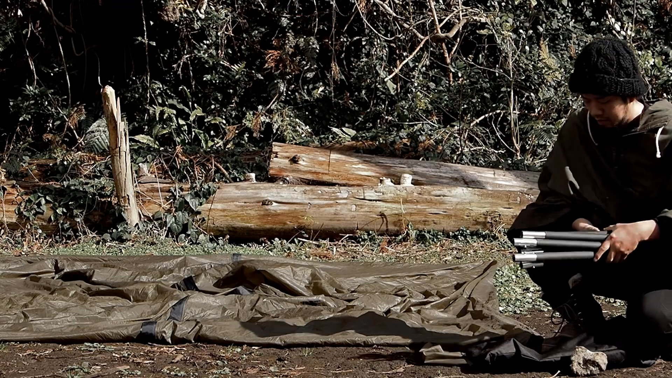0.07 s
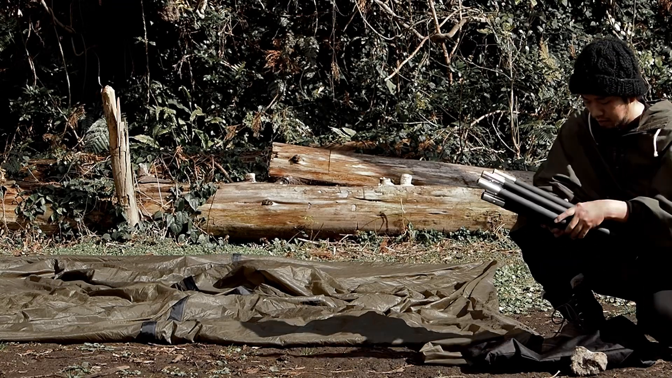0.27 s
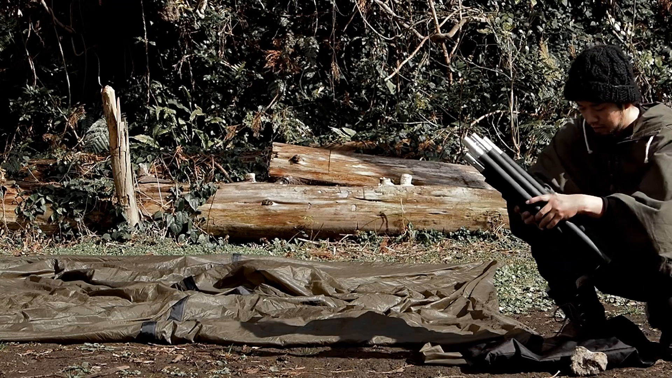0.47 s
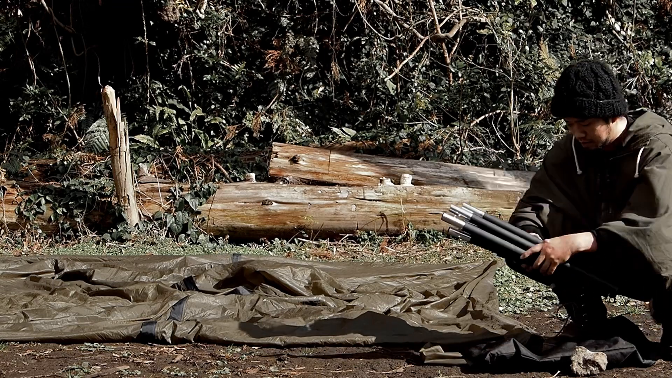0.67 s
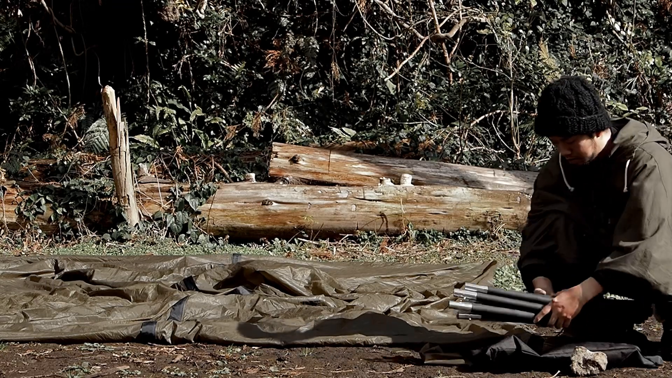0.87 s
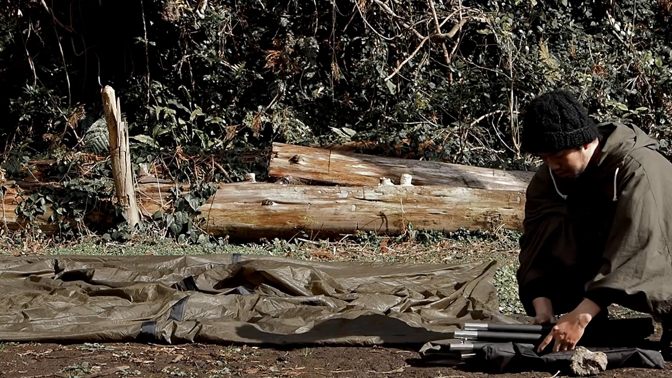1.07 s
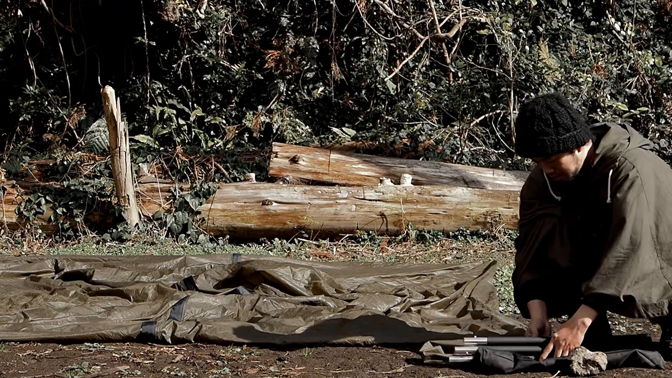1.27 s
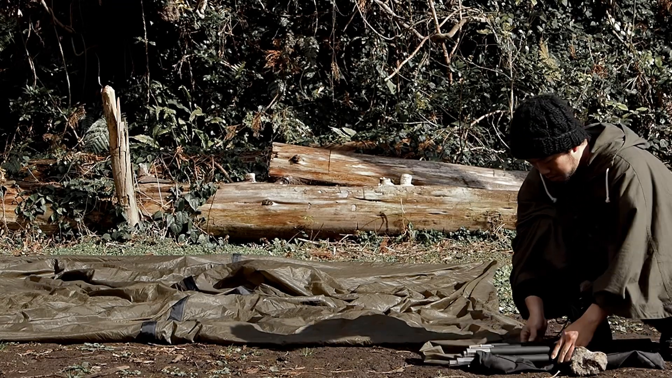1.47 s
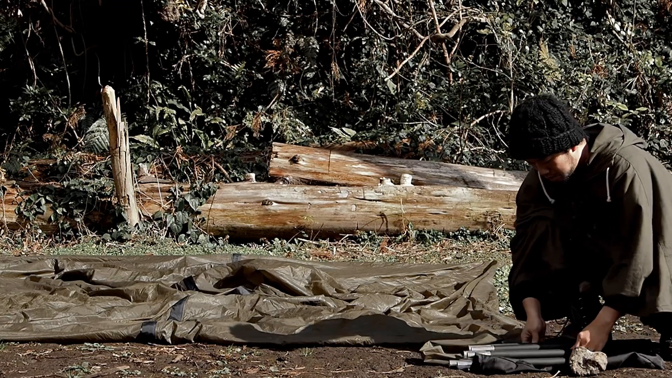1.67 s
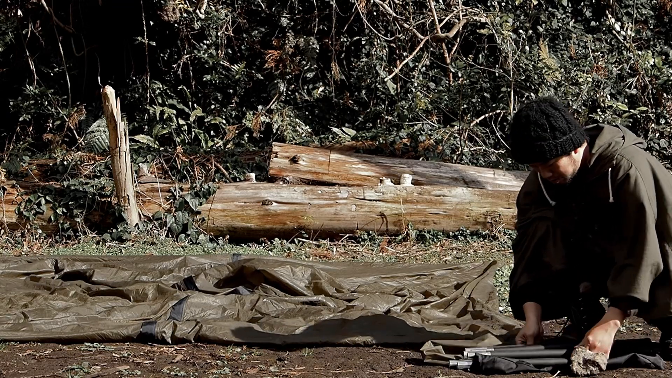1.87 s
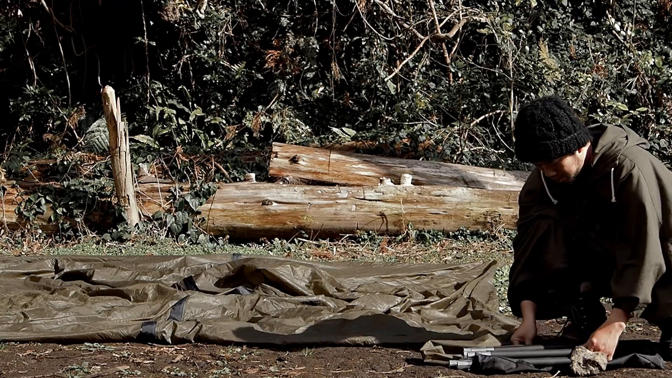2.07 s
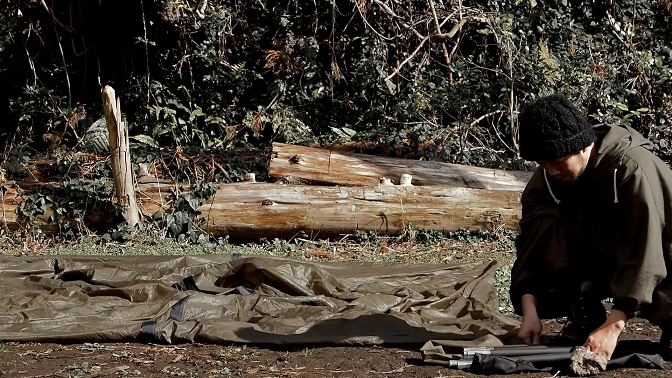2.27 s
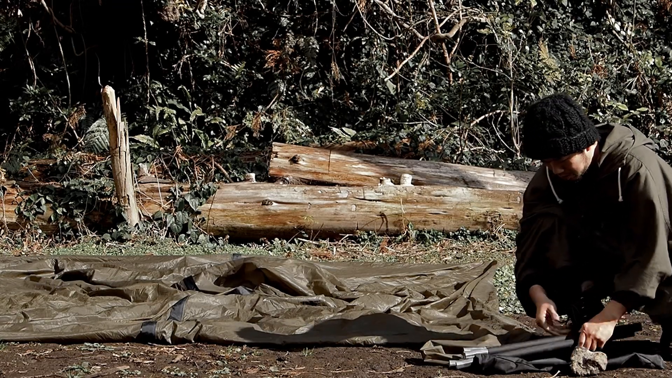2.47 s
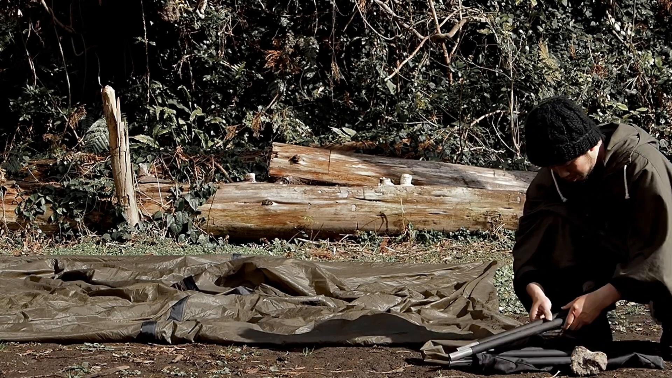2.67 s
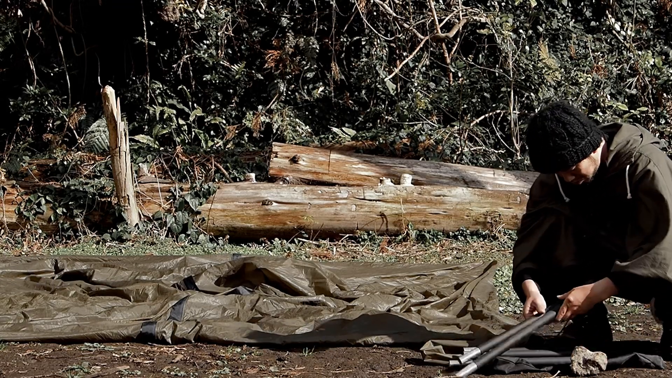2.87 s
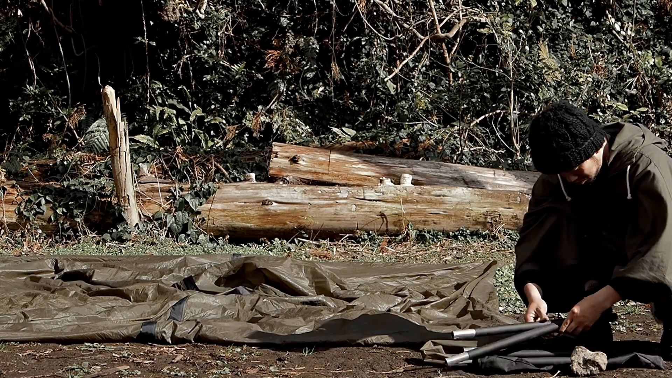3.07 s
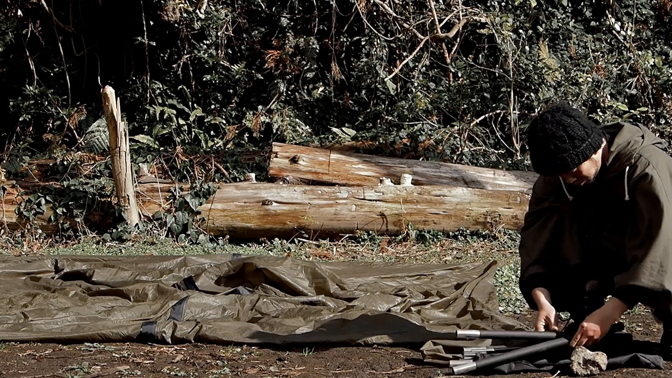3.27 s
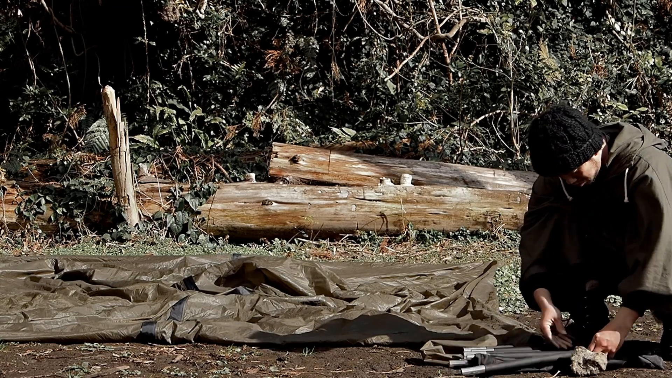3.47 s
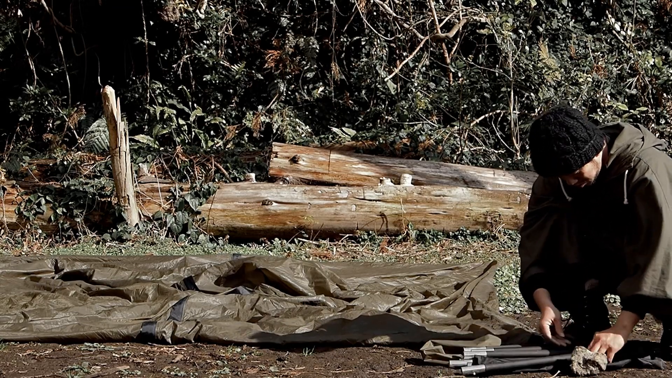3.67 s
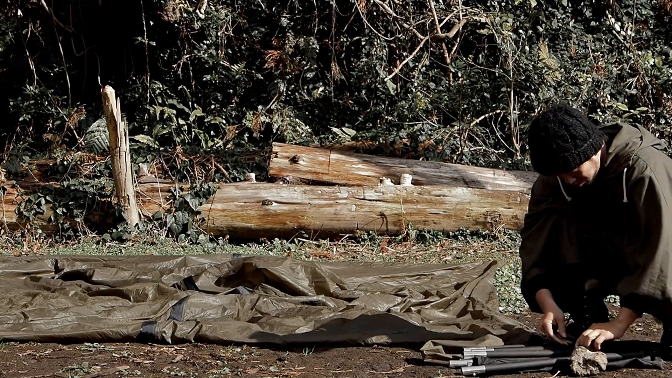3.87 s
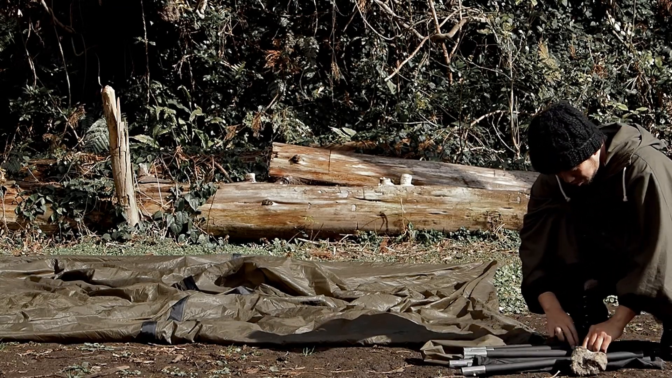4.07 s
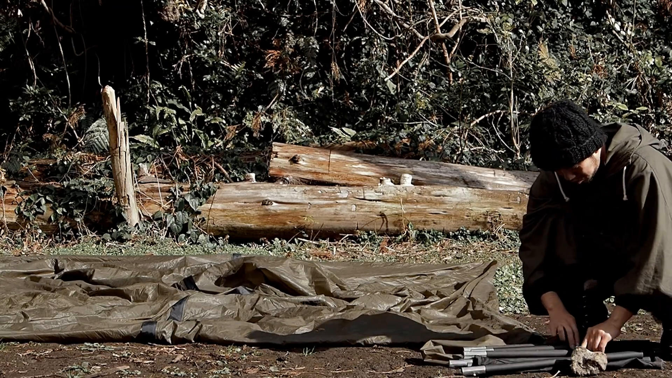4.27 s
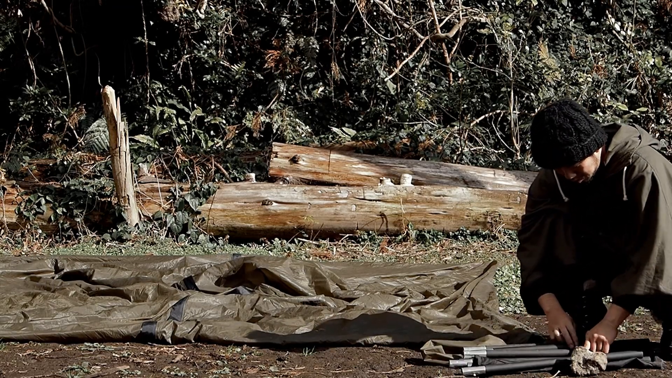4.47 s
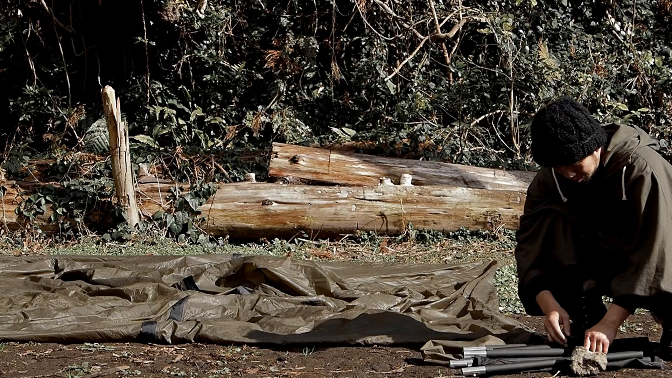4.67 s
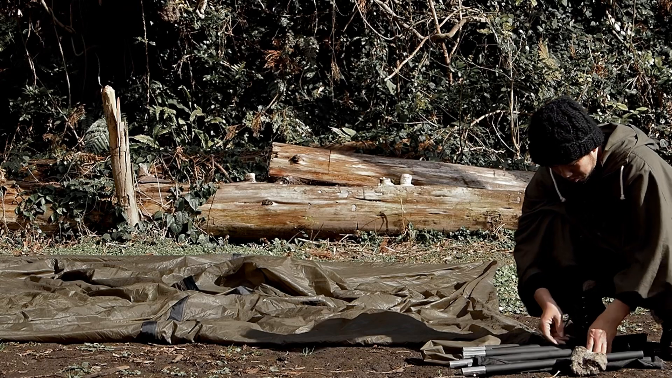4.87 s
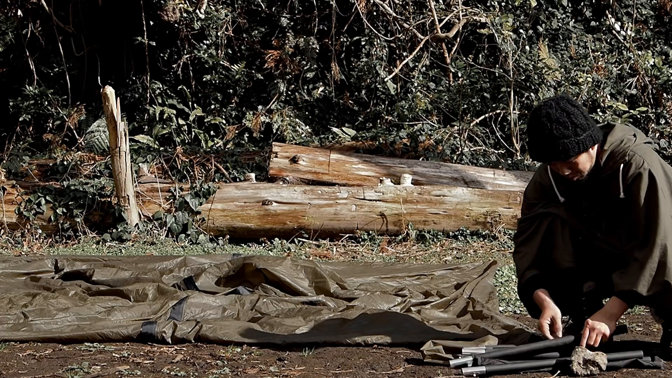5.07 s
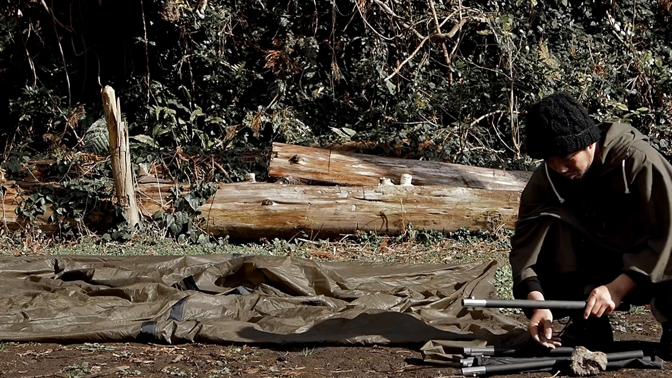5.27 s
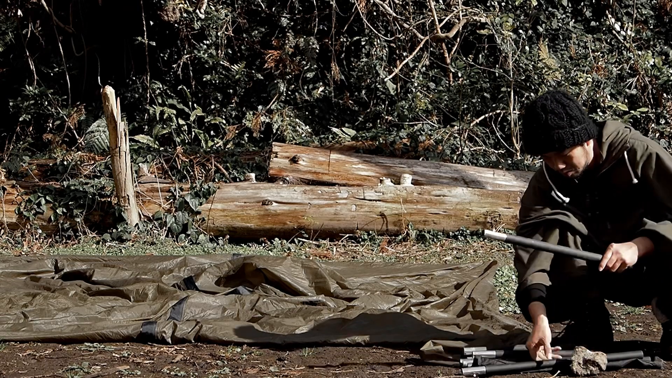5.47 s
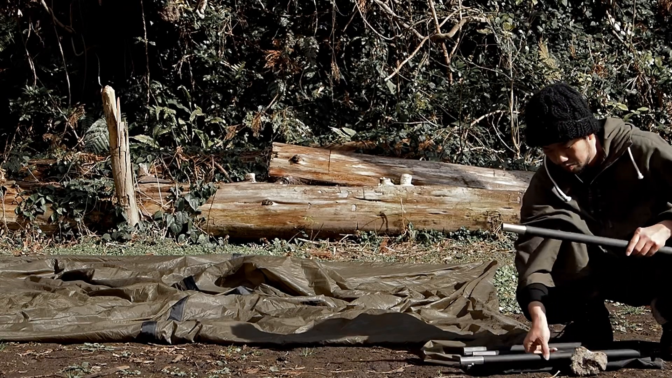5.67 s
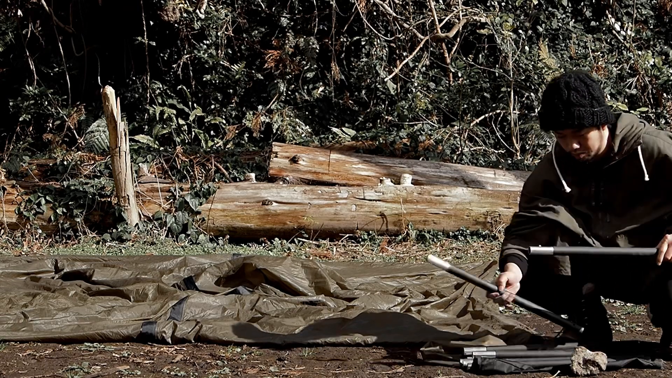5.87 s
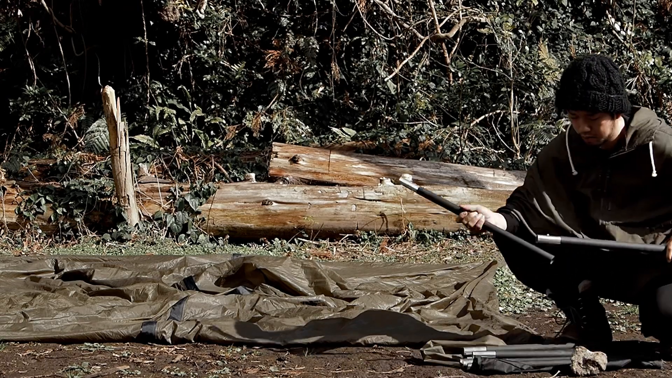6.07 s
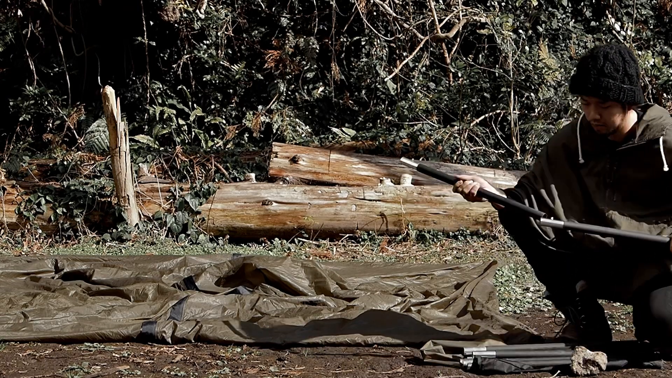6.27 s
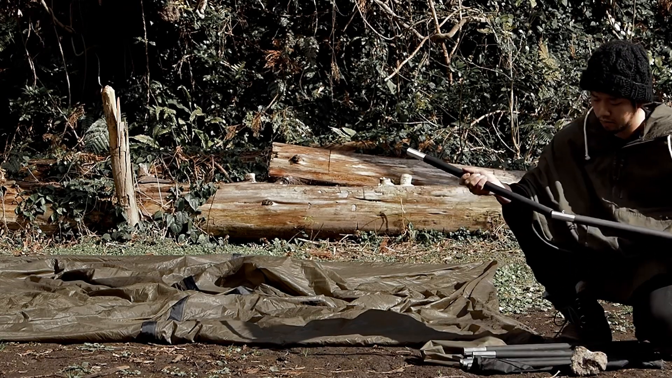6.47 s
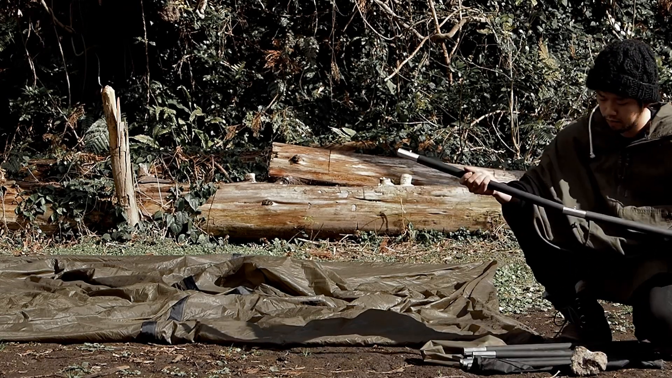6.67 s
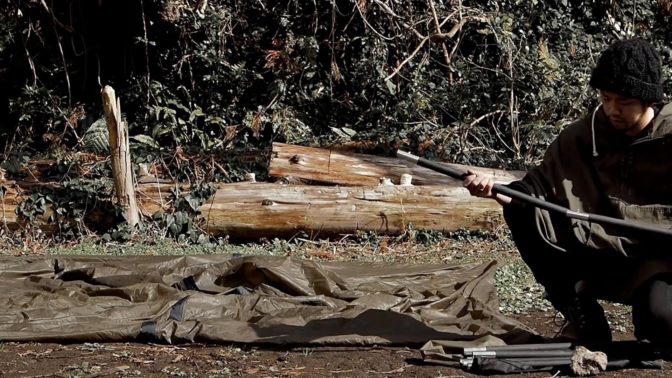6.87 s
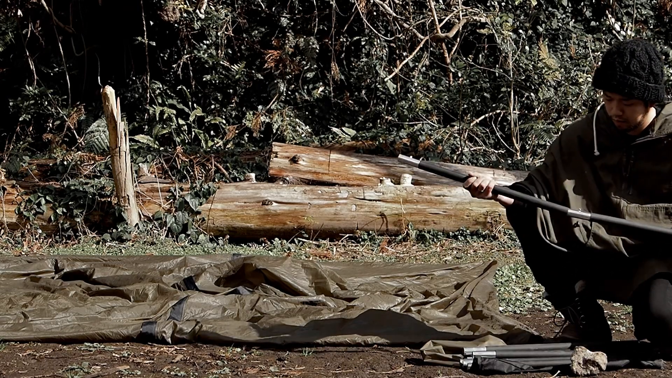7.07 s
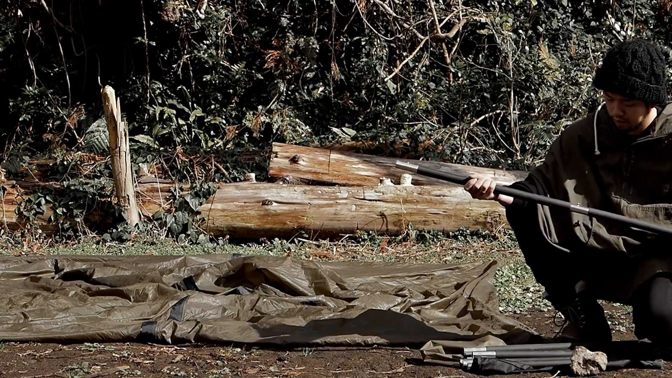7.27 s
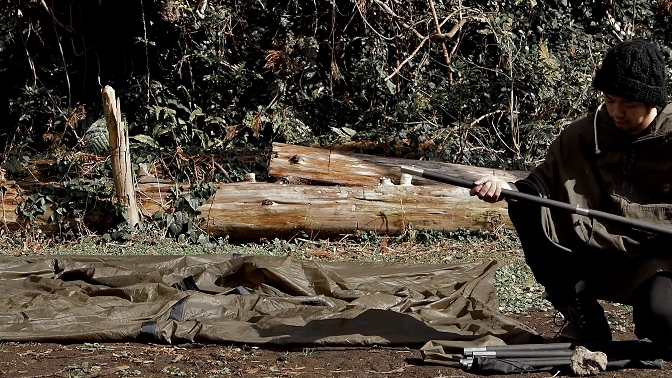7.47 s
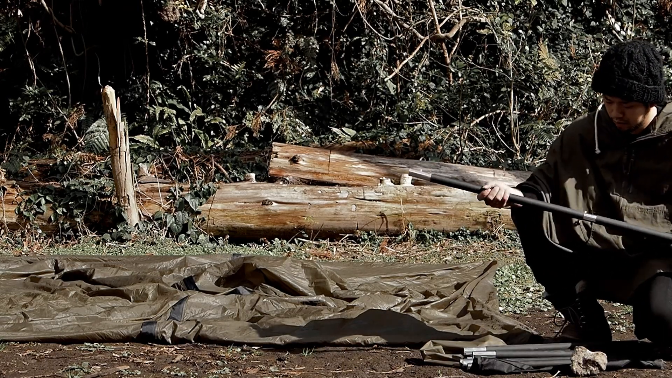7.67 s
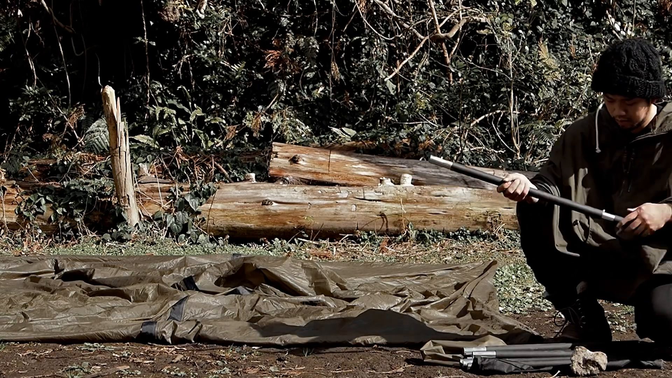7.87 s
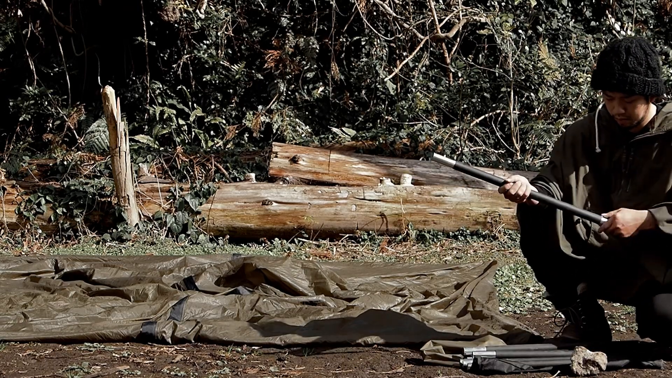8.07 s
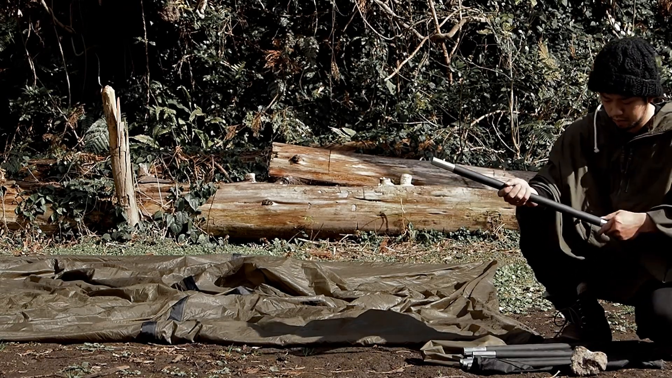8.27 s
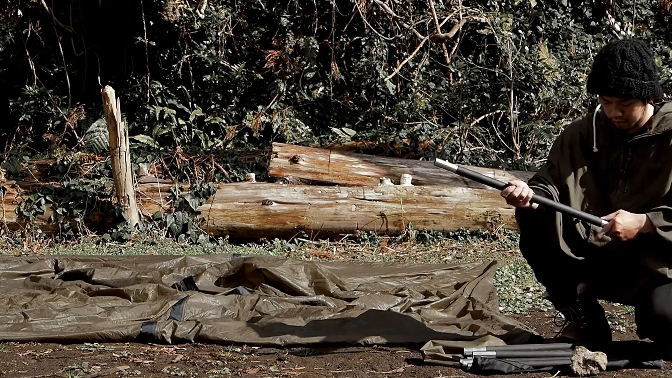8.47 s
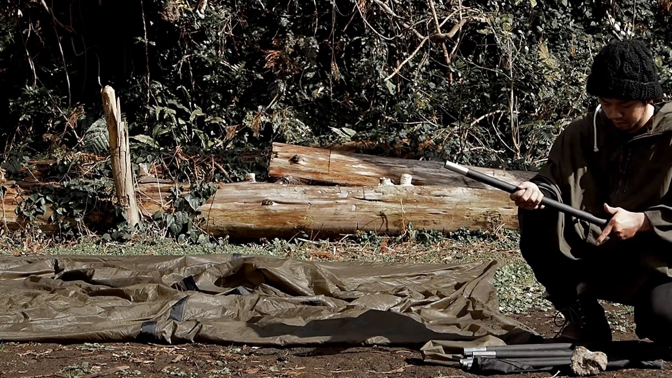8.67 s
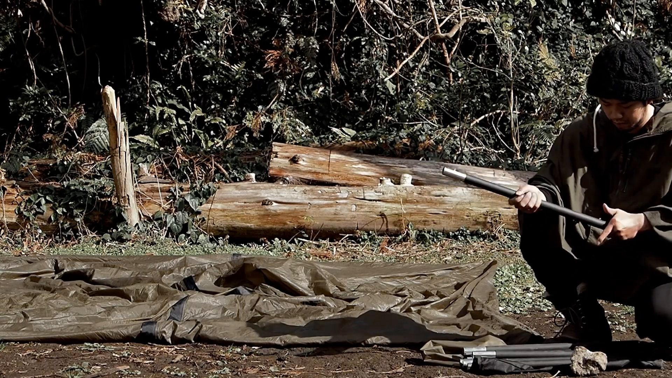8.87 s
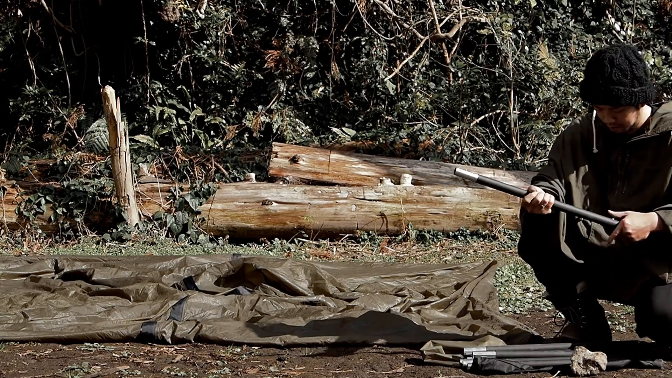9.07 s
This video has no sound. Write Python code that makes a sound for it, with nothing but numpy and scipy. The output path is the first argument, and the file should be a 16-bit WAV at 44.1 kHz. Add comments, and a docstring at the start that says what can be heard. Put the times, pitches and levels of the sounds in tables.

```python
"""A scuff of hollow metal tent poles over a puff of wind at the left port opens the scene; a bundle then
clinks, rattles and skids onto a tarpaulin at the right, is sorted, and two poles are slid together.
Rough contacts build up tuned modes for the metal; filtered noise makes the rustle, wind, air and sliding.
Small birds, near-sine calls smeared into bands, whistle far off in the thicket, which scatters a short tail.
Wind strikes the two microphone ports separately, the right one hardest."""
import sys
import numpy as np
from scipy import signal
from scipy.fft import rfft, irfft, next_fast_len
from scipy.io import wavfile
from scipy.ndimage import uniform_filter1d

SR = 44100
rng = np.random.default_rng(int(sys.argv[2]) if len(sys.argv) > 2 else 0)


def transcribe(signal):
    """Save signal, clipped to [-1, 1], as a 16-bit WAV file at the path in sys.argv[1]."""
    frames = np.atleast_2d(signal).T
    limited = np.clip(frames, -1, 1)
    pcm = np.round(limited * 32767).astype(np.int16)
    wavfile.write(sys.argv[1], SR, pcm)


N = 402191  # length in samples

# Quiet wash of the thicket: hz, gain_db
AIR_SPECTRUM = [(120, -55), (200, -3.5), (289, -1.5), (491, -11), (1160, -5), (1770, -16.5), (2910, -5.5),
                (3970, -11), (5630, -14.5), (10100, -18), (11300, -27), (13800, -16.5), (16000, -37.5)]
AIR_DB = -67
# Likeness of the air in the two ports: hz, likeness (0 unrelated, 1 identical)
AIR_LIKENESS = [(250, 1), (700, 0.56), (2000, 0.09), (6000, 0.063), (15000, 0.054)]

# Gusts, each striking one port: middle_s, peak_db (before turbulence), spread_s, port (0 left, 1 right)
GUSTS = [(0.051, -50, 0.044, 0), (.22, -69, 0.029, 0), (.35, -57, 0.028, 0), (.55, -67, 0.071, 0),
         (.6, -59, 0.096, 1), (1.95, -56, 0.21, 0), (2.05, -62.5, 0.13, 1), (2.2, -51.5, 0.045, 1),
         (2.3, -49, 0.14, 0), (2.702, -47.5, 0.057, 0), (2.798, -41, 0.052, 0), (2.931, -40.5, 0.041, 1),
         (3.05, -44, 0.025, 0), (3.072, -40, 0.052, 1), (3.239, -41.5, 0.028, 0), (3.36, -46.5, 0.15, 0),
         (3.549, -40.5, 0.022, 0), (3.55, -56.5, 0.1, 1), (3.822, -51.5, 0.06, 0), (3.969, -47.5, 0.017, 1),
         (4.075, -45, 0.021, 1), (4.186, -39.5, 0.1, 1), (4.269, -55, 0.014, 1), (4.336, -63, 0.031, 1),
         (4.498, -55, 0.35, 1), (5.002, -50, 0.19, 0), (5.269, -42.5, 0.0098, 0), (5.44, -45.5, 0.038, 1),
         (5.52, -54, 0.085, 1), (5.599, -29, 0.047, 1), (5.688, -42.5, 0.04, 1), (5.764, -46, 0.018, 1),
         (5.972, -46, 0.069, 1), (6.168, -44, 0.062, 1), (6.36, -63.5, 0.36, 1), (7.287, -50, 0.07, 0),
         (7.575, -49.5, 0.044, 0), (8.072, -57.5, 0.18, 1), (8.29, -47.5, 0.13, 1), (8.7, -58, 0.18, 1),
         (9.1, -53.5, 0.18, 1)]
GUST_FALL_DB, GUST_SHAPE = 10, 1  # fall at one spread from the middle; exponent of the fall
BREEZE_DB = -81

# Hands moving the bundle: time_s, rattle_db (before the trim in rattle and the rest below)
HANDLING = [(0.0, -53), (0.25, -66.5), (0.9, -67.5), (1.1, -53), (1.24, -36.5), (1.45, -32.5), (1.6, -43),
            (1.7, -52.5), (2.0, -57), (2.35, -62), (2.5, -59.5), (2.8, -51.5), (3.0, -70.5), (3.5, -65),
            (3.62, -53.5), (3.95, -62), (4.55, -60.5), (4.75, -52), (5.07, -45), (5.2, -48.5), (5.5, -54.5),
            (5.8, -69.5), (7.0, -69.5), (8.1, -88.5), (8.7, -52.5), (8.85, -65.5), (9.12, -57.5)]
BUNDLE_RESTS_S = 5.9  # the rattle sinks 40 dB over the next second
# Cloth and tarpaulin: hz, gain_db
RUSTLE_SPECTRUM = [(120, -72), (300, -27), (700, -9.5), (1500, -14), (3000, -7), (4500, -18), (5500, -5),
                   (8000, -13), (11000, -17), (15000, -17)]
# The rustle follows the rattle, less steeply: its level when the rattle is at BUSY_DB, and dB per dB
RUSTLE_DB, RUSTLE_SLOPE, BUSY_DB = -57.5, 0.82, -42.5

# Modes of the bundle: hz, level_db, t60_s
BUNDLE_MODES = [(995, -17.5, 0.0768), (1360, -7, 0.1), (1393, -11.5, 0.093), (1542, -2.5, 0.025),
                (1760, -16, 0.13), (1828, -9.5, 0.028), (2300, -21.5, 0.0508), (2350, -10, 0.16),
                (2465, 9, 0.089), (2530, -13, 0.55), (2502, 10, 0.099), (2674, 12.5, 0.018),
                (2960, 3, 0.011), (3240, -11, 0.0218), (3765, -9, 0.037), (3880, -0.5, 0.04),
                (5120, -8, 0.15), (5300, -12, 0.14), (5220, -12, 0.12), (5550, -8, .13),
                (5840, -10.5, 0.067), (6200, -13.5, 0.1), (7220, -5, 0.04)]
# Modes of the two poles in the hands: hz, level_db, t60_s
HELD_MODES = [(1340, 6.5, 0.13), (1377, 2.5, 0.099), (2160, 16, 0.026), (1640, 24.5, 0.0087),
              (2320, 23, 0.021), (5010, -7, 0.23), (5550, -26, 0.085), (6350, -8, 0.074), (6800, -8, .03)]
# Modes of the joint, gripped on both sides: hz, level_db, t60_s
JOINT_MODES = [(600, -0.5, 0.041), (1300, 0, 0.035), (1700, 5.5, 0.025), (2950, 18, 0.028),
               (5100, 0, 0.064), (5500, -6, .05), (6900, -2, .02), (14200, -8, .04)]
FAVOUR_DB, FAVOUR_WIDTH_HZ = 9.5, 194  # the place struck favours the modes near one pitch

# Tubes dragged briefly over each other. The three balances are relative to the blow, before trims in excite:
# middle_s, blow_db, low_bending_db, wall_db, ringing_db, contact_s
SCUFFS = [(0.014, -34.5, -13, -20, -9.5, 0.024), (0.171, -42.5, -13, -14.5, -32, 0.016),
          (0.489, -52, -16, -6, -6.5, 0.04), (0.956, -39.5, -3, -5, -34, 0.038),
          (1.14, -44.5, 5.5, -18, -25, .03), (1.202, -27.5, -3.5, -14, -29, 0.013),
          (1.249, -30.5, -1, -38, -5.5, 0.011), (1.31, -28, -18, -36, 0, 0.011),
          (1.391, -30, -15.5, -25, -14, .005), (1.331, -31, -17, -20, -4, 0.0053),
          (1.623, -28.5, -15.5, -19, -8.5, 0.01), (1.91, -35, -5, -21, -20, 0.029),
          (2.532, -52, -5, -18, -4.5, 0.022), (2.298, -49, -8, -0.5, -8, 0.021),
          (2.61, -54, -5, -19, -2, 0.021), (2.699, -55.5, -26, -3.5, 5.5, 0.019),
          (2.847, -47.5, -15, -4, 0.5, 0.034), (3.074, -46.5, -10, -11.5, -2, 0.041),
          (3.237, -43.5, -9, -4, -4.5, 0.015), (3.248, -33, -24, -15, -3.5, 0.0059),
          (3.323, -46.5, -19, -15, 2, 0.0085), (3.806, -38, -18, -11.5, 5, 0.011),
          (4.223, -45, -8, -2, -16, 0.02), (4.53, -52.5, -27, -8.5, 5, 0.013),
          (4.802, -35, -7, -20, -8, 0.0084), (4.865, -51, -43, -35, 11.5, 0.0098),
          (5.078, -35.5, -8.5, -9.5, 0, 0.012), (5.119, -40.5, -5, 1, -9, 0.014),
          (5.439, -36.5, -7, -8.5, -11, 0.033), (5.582, -49, -10.5, -22, 1.5, 0.0074),
          (5.723, -44.5, -12.5, -11, -1, 0.012)]
# Short rubs at the joint: middle_s, blow_db, low_bending_db, wall_db, ringing_db, contact_s
JOINT_RUBS = [(7.248, -51, -21.5, 0.5, -5, 0.009), (7.287, -53, -24, -0.5, -22, 0.0074),
              (7.45, -48, -30, -3, -7, .006), (7.475, -52, -26, -3, -12, 0.015)]
SCUFF_CRACK_DB, SCUFF_CRACK_SLOPE = -26.5, 0.72  # base crack, and dB per dB of wall balance

# Clinks in the bundle, balances as for the scuffs:
# start_s, blow_db, low_bending_db, wall_db, ringing_db, contact_s, favoured_hz
CLINKS = [(0.109, -39, -3.5, -22, -30, 0.0038, 5300), (0.9652, -14.5, -13, -12.5, -19.5, 0.0042, 995),
          (1.1937, -21.5, 9.5, -9, -19, 0.0019, 5800), (1.279, -14.5, -9, -13, -15, 0.015, 5670),
          (1.381, -17, -13.5, -15.5, -18, 0.01, 5300), (1.4078, -24, -6, -17, -7.5, 0.0043, 2370),
          (1.427, -21, -18, -25, -1.5, 0.0035, 3850), (1.4889, -15.5, -5, -13.5, -6, 0.0039, 5460),
          (1.4987, -22.5, -4.5, -6, -4, 0.003, 2350), (1.507, -24.5, -2, -23, 0, 0.0042, 5100),
          (1.618, -24, -9, -26, -19, 0.0019, 5210), (1.728, -39.5, -9, -37, -11.5, 0.0026, 2420),
          (1.767, -42, 1, -35, -21, 0.0022, 1430), (1.797, -42, -19, -23, -13, .004, 2960),
          (2.131, -34.5, -10, -20, -10, 0.0042, 5300), (2.2724, -35, -15, -16, -1.5, 0.0067, 5200),
          (2.562, -39, -4.5, -9, -14, 0.027, 5300), (2.6012, -34, -10, -10, -37, 0.0056, 5300),
          (3.013, -49, -6, -13, -4.5, 0.0053, 5300), (3.5356, -12.5, -17.5, -14, -15.5, 0.0035, 2465),
          (3.5894, -28.5, -9, -15, -33, 0.011, 5300), (3.719, -39, -1, -33, -33, 0.0015, 5300),
          (3.7661, -27, -12, -11, 1.5, 0.0067, 5580), (4.079, -37.5, 0.5, -38, -33, 0.0028, 5300),
          (4.099, -51.5, 3, -7, -2, 0.0022, 5300), (4.432, -38, -13.5, -24, -2, 0.0051, 5300),
          (4.5157, -42.5, -14, -12, -1, 0.0027, 5300), (4.6042, -38.5, -9, -41, -2, 0.038, 5300),
          (4.702, -36, -6.5, -25, -11, 0.0023, 5300), (4.7759, -36, -20, -20, -1, 0.0046, 5300),
          (4.8154, -18, -17, -18.5, -10.5, 0.0035, 2960), (4.8202, -30, -20, -18, -22, 0.0013, 2960),
          (4.9066, -28, -21, -32, -1, 0.007, 5300), (4.966, -31, -29, -13, 9, 0.079, 5500),
          (5.002, -32.5, -1, -11.5, -6.5, 0.0086, 5300), (5.043, -29, -8, -12, -6, 0.0078, 5530),
          (5.1475, -31, -1.5, -25, -12, 0.005, 5100), (5.1971, -27, -18, -19, 2.5, 0.0035, 5300),
          (5.214, -36, -18, -19, -7, 0.0018, 5300), (5.2263, -12.5, -27, -10, -7.5, 0.0012, 2960),
          (5.2314, -20, -47, -12, 1.5, 0.0058, 5300), (5.246, -49.5, 0, -31, 3.5, 0.026, 1345),
          (5.3887, -16, -20, -19, -5.5, 0.0031, 5620)]
# Knocks of the two held poles: start_s, blow_db, low_bending_db, wall_db, ringing_db, contact_s, favoured_hz
KNOCKS = [(6.303, -36, -12, -14, -7, 0.002, 6350), (6.3332, -45, -10, -14, -6.5, 0.0047, 5550),
          (6.442, -35.5, -8.5, -13, -6.5, 0.005, 5010), (6.4965, -34.5, -12.5, -16.5, -8.5, 0.0045, 5010)]
# Snaps of the joint: start_s, blow_db, low_bending_db, wall_db, ringing_db, contact_s, favoured_hz
SNAPS = [(7.2935, -40.5, -11, -8, -17, .003, 1300), (7.489, -32.5, -22.5, -5, -22, .004, 2950),
         (7.495, -54.5, -3, -30, -3, 0.002, 600), (7.502, -40, -14, -16, -20, .003, 1700),
         (8.246, -53, -16, -4, -22, .0025, 5500), (8.6207, -20.5, -21.5, -5, -20, 0.0052, 6900),
         (8.727, -57, -7, 1, -20, .0022, 5500), (8.756, -26.5, -18.5, 0, -30, 0.003, 5500)]
# How bundle tubes are struck: trailing_rub_share, tick_share, crack_db, crack_db_per_wall_db, body_2500_hz_db
BUNDLE_STRIKE = (0.2957, 0.7, -6.5, 2, 10.5)
# How held poles are struck: trailing_rub_share, tick_share, crack_db, crack_db_per_wall_db, body_2500_hz_db
HELD_STRIKE = (0.9, -0.1, -13.5, 1.77, -5)
# How the joint is struck: trailing_rub_share, tick_share, crack_db, crack_db_per_wall_db, body_2500_hz_db
JOINT_STRIKE = (0.18, 1.9, -12.5, 2.73, 3)

# Distant birds, one call a row: start_s, length_s, level_db (at the start), pitch_hz (after the scoop), blur_hz
BIRDS = [(0.624, 0.054, -63.5, 6500, 250), (0.723, 0.37, -56, 3710, 354), (6.1, 0.34, -68.5, 3610, 300),
         (6.636, 0.16, -69.5, 3430, 200), (6.824, 0.16, -70, 3090, 250), (7.117, 0.26, -69, 3220, 705),
         (8.789, .17, -60, 3960, 590), (8.924, 0.14, -56.5, 4010, 654), (9.027, 0.13, -48.5, 4490, 610)]
SCOOP, SCOOP_S, CALL_FADE_DB_PER_S = 0.28, 0.022, 18  # share below pitch at the start, time constant, fade

# Tubes skidding over the tarpaulin: start_s, length_s, peak_db, from_hz, to_hz
SKIDS = [(1.278, .09, -36, 2760, 2330), (1.378, .04, -38, 2850, 2480), (1.418, .07, -38, 2580, 2380),
         (1.225, .04, -43, 2500, 2700)]
SKID_WIDTH_HZ = 110

# One tube sliding into the other, a stroke a row: start_s, length_s, peak_db (before the trim in slide), swell_share
SLIDES = [(7.56, 0.62, -62, 0.2), (8.439, 0.17, -55.5, 1)]
# Friction of the tube walls: hz, gain_db
SLIDE_SPECTRUM = [(300, -58), (1500, -16.5), (4600, -14), (5300, 2), (6200, -6.5), (7500, -12), (11000, -7),
                  (14500, -7), (16000, -3)]

# Delay at the left port, since the poles are nearer the right: hz, lag_samples
LEFT_LAG = [(500, 3.67), (4000, 2.74), (9000, 1.87), (15000, 0.56)]
# Shading at the left port: hz, gain_db
LEFT_SHADE = [(500, 0.5), (2000, -0.5), (5000, -4), (8000, -0.5), (13000, -11.5)]
EDGE_HZ = 16100  # top of the sound


def gain_of(db):
    """Decibels to gain."""
    return np.exp(np.asarray(db) * (np.log(10) / 20))


def evened(x):
    """Scales to rms 1."""
    return x / np.sqrt(np.mean(x ** 2) + 1e-20)


def read(points, hz):
    """Value of a spectrum table on a log-frequency axis."""
    f, value = np.transpose(points)
    return np.interp(np.log(hz + 1), np.log(f + 1), value)


def track(rows):
    """Columns of a curve table at every sample."""
    s, *columns = np.transpose(rows)
    return [np.interp(np.arange(N) / SR, s, c) for c in columns]


def coloured(x, points):
    """Filters x by a spectrum table."""
    size = next_fast_len(len(x) + 2048)
    gain = gain_of(read(points, np.fft.rfftfreq(size, 1 / SR)))
    return irfft(rfft(x, size) * gain, size)[:len(x)]


def lumps(span):
    """Slow random drift of rms 1, smoothed twice over span samples."""
    once = uniform_filter1d(rng.standard_normal(N), int(span))
    return evened(uniform_filter1d(once, int(span)))


def add(mix, s, sound):
    """Mixes a sound in at time s."""
    part = mix[round(s * SR):][:len(sound)]
    part += sound[:len(part)]


def air():
    """The quiet wash of the thicket: patchy noise, partly alike in both ports."""
    frames, hz = N // 256 + 5, np.fft.rfftfreq(1024, 1 / SR)
    a, b, c, d, patches = rng.standard_normal((frames, 513, 5)).T
    patches = evened(uniform_filter1d(uniform_filter1d(patches, 12, 0), 14, 1))
    same = np.clip(read(AIR_LIKENESS, hz), -1, 1)[:, None]
    left = a + 1j * b
    right = same * left + np.sqrt(1 - same ** 2) * (c + 1j * d)
    z = np.array([left, right]) * gain_of(read(AIR_SPECTRUM, hz)[:, None] + 2.2 * patches)
    wash = signal.istft(z, nperseg=1024, noverlap=768)[1][:, :N]
    return gain_of(AIR_DB) * evened(wash)


def gusts():
    """Level in dB at each port: a light breeze, and every gust swelling and sinking alike."""
    t = np.arange(0, N / SR + .01, .004)
    level = np.full((2, len(t)), gain_of(BREEZE_DB))
    for middle, peak_db, spread, port in GUSTS:
        fall_db = GUST_FALL_DB * abs((t - middle) / spread) ** GUST_SHAPE
        level[round(port)] += gain_of(peak_db - fall_db)
    return track(np.vstack([t, 20 * np.log10(level)]).T)


def wind():
    """Lumpy turbulence, unrelated at the two ports; strong gusts reach higher."""
    low_spectrum = [(10, -35.0), (35, -2.0), (90, -4.5), (150, -9.5), (400, -67.5)]
    high_spectrum = [(50, -24.5), (120, 4.0), (250, -1), (420, -10.5), (560, -19.5),
                     (1000, -38.0), (2000, -68.5)]
    out = []
    for level_db in gusts():
        port_db = level_db + 2.5 * lumps(760) + 2.3 * lumps(231)
        low = evened(coloured(rng.standard_normal(N), low_spectrum))
        high = evened(coloured(rng.standard_normal(N), high_spectrum))
        high *= gain_of(4.05 * lumps(350) - 0.5)
        share = np.clip((port_db + 63) / 25, 0, 1)  # how far the gust reaches up
        out.append(gain_of(port_db) * ((1 - 0.61 * share) * low + share * high))
    return np.array(out)


def rattle(level_db):
    """Clumps of light touches; each pair of tubes rings its own mix of the modes."""
    t, out, pairs = np.arange(6000) / SR, np.zeros(N), 14
    rate = 260 * gain_of(3.3 * lumps(600))  # touches a second
    size = gain_of(1.82 * np.minimum(rng.exponential(1, N), 4))
    touches = size * (rng.random(N) < rate / SR) * gain_of(level_db)
    pair = rng.integers(0, pairs, N)
    hz, db, t60 = np.transpose(BUNDLE_MODES)[:, :, None]
    tilt_db = read([(1400, -0.5), (2500, -14.0), (3300, -8.0), (3800, -2.5), (6000, -16)], hz)
    for k in range(pairs):
        tune, strength = rng.random((2, len(BUNDLE_MODES), 1)) - .5
        fade_db = 60 * t / (0.51 * t60)  # light touches die in about half the modes' t60
        swing = np.sin(2 * np.pi * hz * (1 + 0.09 * tune) * t)
        ring = gain_of(db + tilt_db + 11 * strength - fade_db) * swing
        soft_ring = ring.sum(0) * (1 - np.exp(-t / 0.0011))
        out += signal.oaconvolve(touches * (pair == k), soft_ring)[:N]
    return gain_of(-5.0) * out


def rustle(level_db):
    """Cloth and tarpaulin: a clumpy hiss with fine crackle."""
    grain = gain_of(3.7 * np.minimum(rng.exponential(1, N), 4))
    crackle = grain * (rng.random(N) < 2500 / SR) * rng.standard_normal(N)
    busy = np.clip((level_db + 77.5) / 14, 0, 1)  # busy hands rustle in bursts
    hiss = rng.standard_normal(N) * gain_of(3.4 * lumps(341) + 1.5 * busy * lumps(2200))
    cloth = coloured(hiss + 0.13 * evened(crackle), RUSTLE_SPECTRUM)
    return gain_of(level_db + 8.0) * evened(cloth)


def excite(table, touch, middle, low_db, wall_db, crack_db, ring_db, wall_hz, body_db=8.5):
    """A rough contact, loudest where the tube walls give, builds up modes tuned a little apart each time."""
    hz, db, t60 = np.transpose(table)[:, :, None]
    t = np.arange(len(touch)) / SR
    tune, strength, phase = rng.random((3, len(table), 1))
    colour_db = read([(1700, low_db + 20.0), (2000, 0.0091), (3300, 0.0172), (3600, wall_db + 17.5),
                      (8000, wall_db + 13.0), (9000, crack_db + 55.0)], hz)
    colour_db = colour_db + FAVOUR_DB * np.exp(-((hz - wall_hz) / FAVOUR_WIDTH_HZ) ** 2)
    fade_db = 60 * np.maximum(t - middle, 0) / t60
    swing = np.sin(2 * np.pi * (hz * (1 + .02 * (tune - .5)) * t + phase))
    modes = gain_of(db + colour_db + 7.7 * strength - 16.5 - fade_db) * swing
    build = np.sqrt(np.cumsum(touch ** 2) / np.sum(touch ** 2))  # follows the energy put in so far
    grit = rng.standard_normal(len(t)) * touch
    grit *= np.linalg.norm(touch) / np.linalg.norm(grit)
    crack = coloured(grit, [(120, -65.0), (300, -25.0), (1300, low_db + 12.5), (1900, -5), (2500, body_db),
                            (3200, -1.0), (4400, wall_db), (5400, wall_db + 13.0), (8500, crack_db + 23.0),
                            (11500, crack_db + 20.5), (15000, crack_db + 21)])
    return gain_of(ring_db) * build * modes.sum(0) + gain_of(-4.5) * crack


def scuff(table, s, blow_db, low_db, wall_db, ring_db, contact):
    """A contact that swells and fades, chattering as the tubes catch."""
    t, start = np.arange(6500) / SR, max(s - 2 * contact, 0)
    middle = s - start
    chatter = gain_of(3.05 * evened(uniform_filter1d(rng.standard_normal(len(t)), 90)))
    touch = np.exp(-((t - middle) / contact) ** 2) * chatter
    crack_db = SCUFF_CRACK_DB + SCUFF_CRACK_SLOPE * wall_db
    wall_hz = rng.uniform(4830, 6100)
    sound = excite(table, touch, middle, low_db, wall_db, crack_db, ring_db, wall_hz)
    return start, gain_of(blow_db) * sound


def clink(table, trail, tick, crack_db, slope, body_db,
          s, blow_db, low_db, wall_db, ring_db, contact, wall_hz):
    """A sudden contact that dies away, with a rub trailing it, faint or strong by object."""
    t, contact = np.arange(6000) / SR, max(contact, 2e-4)
    onset = 1 - np.exp(-t / (0.21 * contact))
    touch = onset * (np.exp(-t / contact) + trail * np.exp(-t / 0.013))
    # the tick shapes the first instant, more so on bright blows
    touch += tick * gain_of(.5 * wall_db) * np.exp(-((t - .001) / 0.00067) ** 2)
    bright_db = crack_db + slope * wall_db
    return s, gain_of(blow_db) * excite(table, touch, 0, low_db, wall_db, bright_db, ring_db, wall_hz, body_db)


def whistle(start, length, level_db, top_hz, blur_hz):
    """A near-sine call scoops up to pitch and fades, smeared into a band by distance and leaves."""
    t = np.arange(0, length, 1 / SR)
    smear = signal.lfilter(*signal.butter(2, blur_hz / SR), rng.standard_normal((2, len(t))))
    pitch_hz = top_hz * (1 - SCOOP * np.exp(-t / SCOOP_S))
    tone = np.exp(2j * np.pi * np.cumsum(pitch_hz) / SR)
    call = evened((tone * (smear[0] + 1j * smear[1])).real)
    return start, gain_of(level_db - CALL_FADE_DB_PER_S * t) * call * signal.windows.tukey(len(t), .3)


def skid(start, length, peak_db, from_hz, to_hz):
    """Friction noise rings one gliding resonance, mostly sinking as more of the tube lies down."""
    u = np.arange(0, length, 1 / SR) / length
    noise = rng.standard_normal((2, len(u) + 2000))
    sway = signal.lfilter(*signal.butter(2, SKID_WIDTH_HZ / SR), noise)[:, 2000:]  # drop the filter's start
    tone = np.exp(2j * np.pi * np.cumsum(from_hz + (to_hz - from_hz) * u) / SR)
    ring = evened((tone * (sway[0] + 1j * sway[1])).real)
    return start, gain_of(peak_db) * np.sin(np.pi * np.sqrt(u)) * ring


def slide():
    """Fine friction hiss, coloured by the tube walls."""
    level = np.zeros(N)
    for start, length, peak_db, swell in SLIDES:
        u = np.arange(0, length, 1 / SR) / length
        stroke = np.interp(u, [0, min(swell, .99), 1], [0, 1, 0]) ** 1.43
        add(level, start, gain_of(peak_db) * stroke)
    hiss = rng.standard_normal(N) * gain_of(1.4 * lumps(200))
    return gain_of(7.5) * level * evened(coloured(hiss, SLIDE_SPECTRUM))


def ports(x):
    """A source on the right reaches the left port later and duller."""
    size = next_fast_len(N)
    hz = np.fft.rfftfreq(size, 1 / SR)
    late = gain_of(read(LEFT_SHADE, hz)) * np.exp(-2j * np.pi * hz * read(LEFT_LAG, hz) / SR)
    return np.array([irfft(rfft(x, size) * late, size)[:N], x])


def thicket(x):
    """Logs and foliage scatter a short sparse tail, different in each port."""
    t = np.arange(9000) / SR
    sparse = rng.standard_normal((2, len(t))) * (rng.random((2, len(t))) < .05)
    taps = sparse * gain_of(-60 * t / .28) * (t > .004)  # from 4 ms on, 60 dB down per 0.28 s
    return signal.oaconvolve(x[None], taps / np.linalg.norm(taps[0]), axes=1)[:, :N]


def scene():
    """Poles, handling and birds at the ports, with scatter, wind and air."""
    poles, birds = np.zeros(N), np.zeros(N)
    for row in SCUFFS:
        add(poles, *scuff(BUNDLE_MODES, *row))
    for row in CLINKS:
        add(poles, *clink(BUNDLE_MODES, *BUNDLE_STRIKE, *row))
    for call in BIRDS:
        add(birds, *whistle(*call))
    for row in SKIDS:
        add(poles, *skid(*row))
    for row in KNOCKS:
        add(poles, *clink(HELD_MODES, *HELD_STRIKE, *row))
    for row in JOINT_RUBS:
        add(poles, *scuff(JOINT_MODES, *row))
    for row in SNAPS:
        add(poles, *clink(JOINT_MODES, *JOINT_STRIKE, *row))
    rattle_db, = track(HANDLING)
    rustle_db = RUSTLE_DB + RUSTLE_SLOPE * (rattle_db - BUSY_DB)
    rattle_db -= 40 * np.clip(np.arange(N) / SR - BUNDLE_RESTS_S, 0, 1)
    sources = poles + rattle(rattle_db) + rustle(rustle_db) + slide() + birds
    scatter = thicket(coloured(sources, [(3000, 0.2), (5500, 1), (14000, -0.5)]))
    return ports(sources) + gain_of(-15.0) * scatter + wind() + air()


def record(dry):
    """A steep low-pass closes off the top of the sound."""
    lowpass = signal.firwin(301, EDGE_HZ, window=("kaiser", 9), fs=SR)
    return signal.oaconvolve(dry, lowpass[None], "same")


dry = scene()
out = record(dry)
transcribe(out)
```